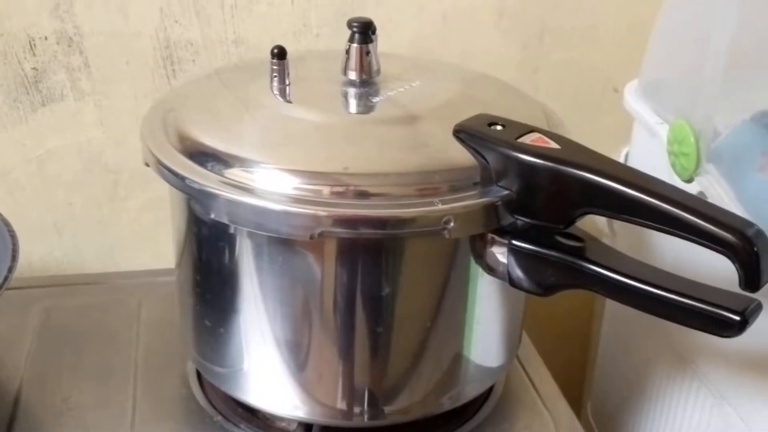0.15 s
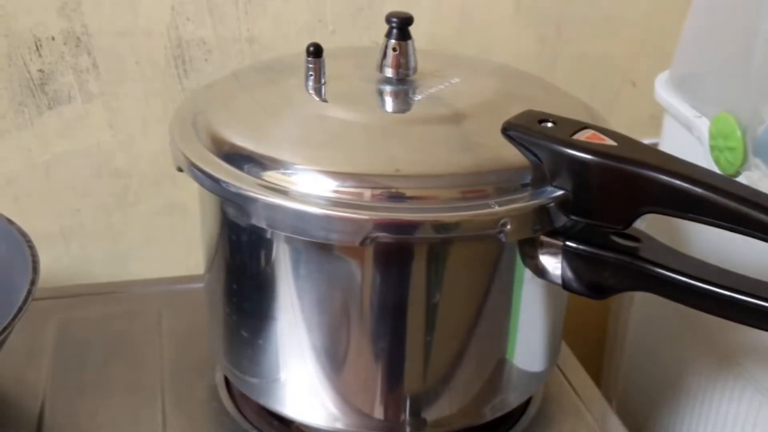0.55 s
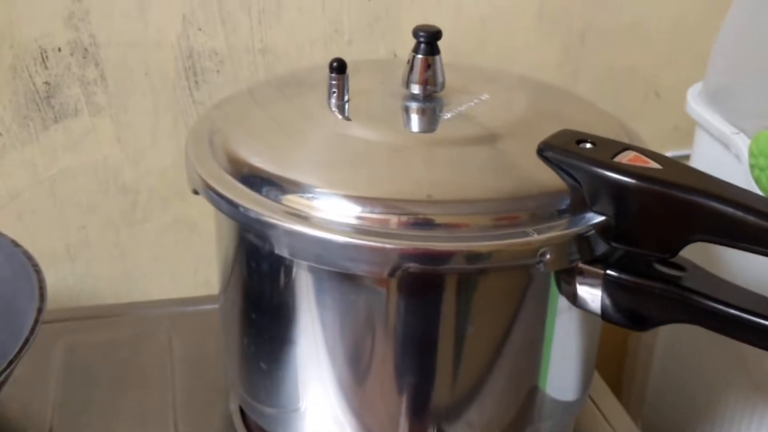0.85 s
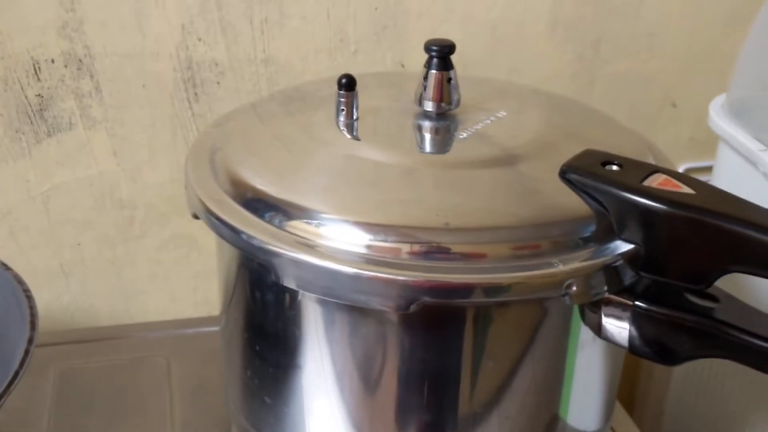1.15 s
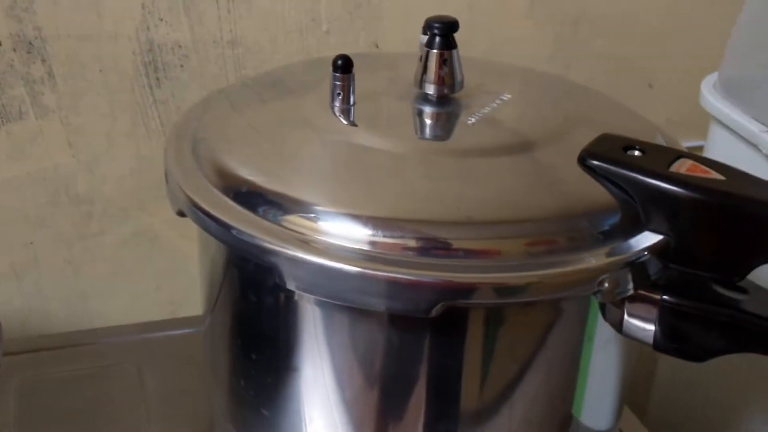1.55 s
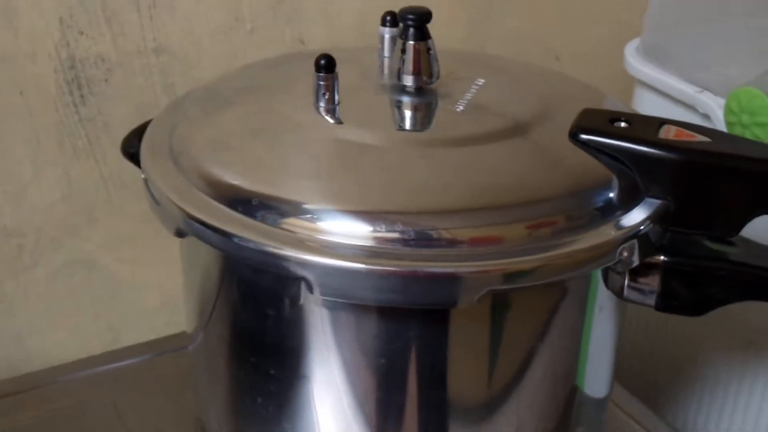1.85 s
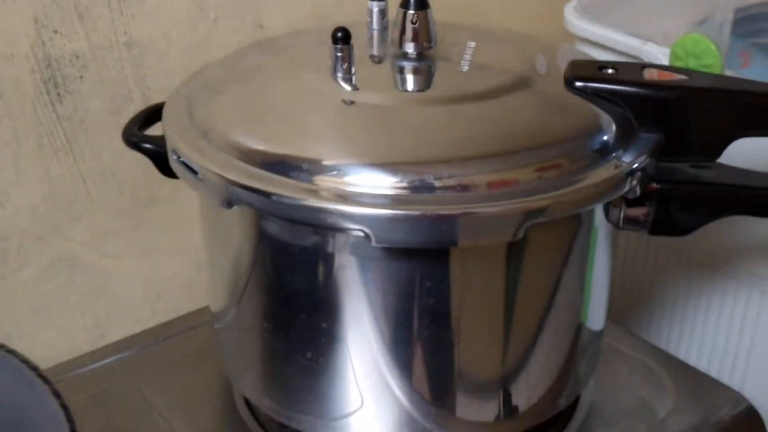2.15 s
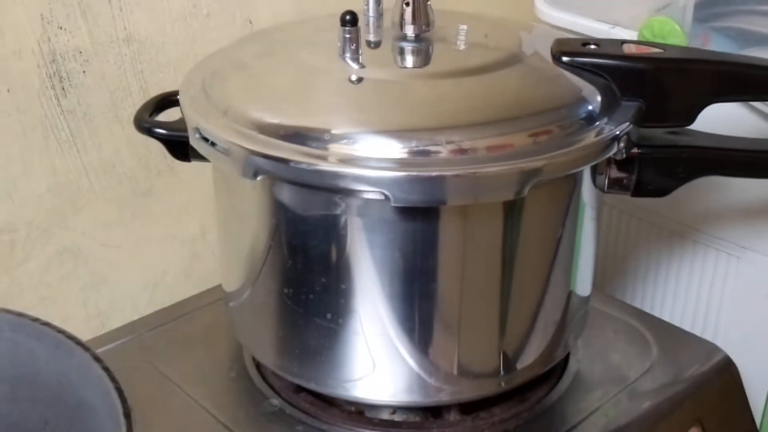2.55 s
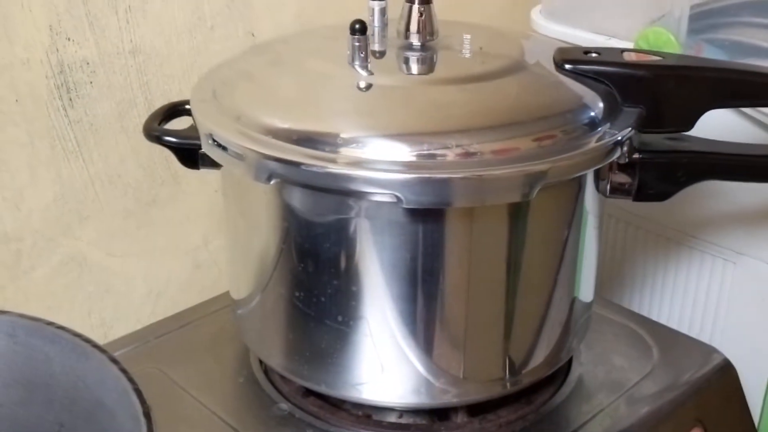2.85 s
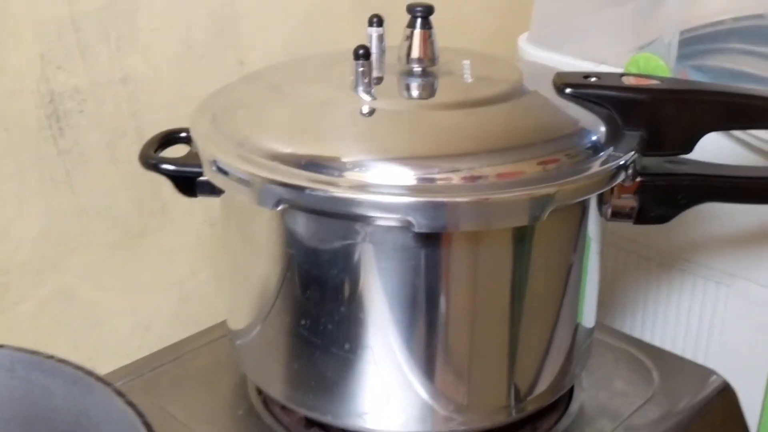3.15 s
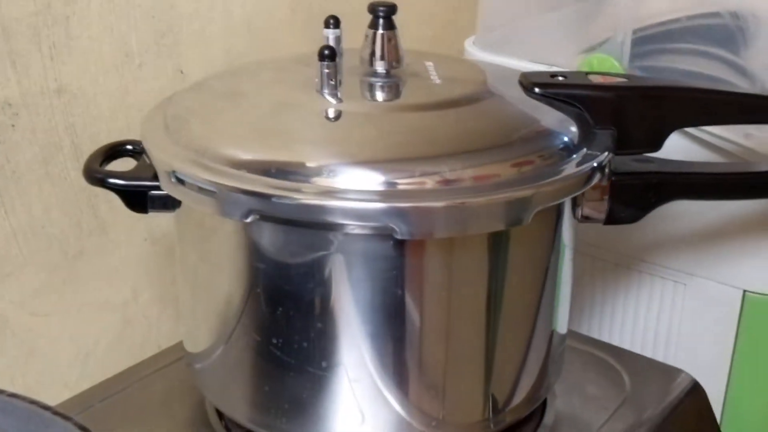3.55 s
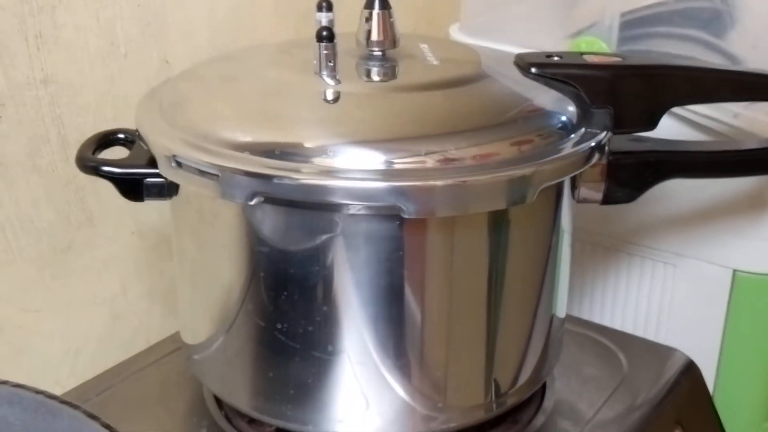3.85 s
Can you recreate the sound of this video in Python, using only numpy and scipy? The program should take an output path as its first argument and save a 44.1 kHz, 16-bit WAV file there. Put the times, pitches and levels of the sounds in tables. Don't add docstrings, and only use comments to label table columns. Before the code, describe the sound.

A loud bright steam hiss rushes from a pressure cooker's rocking weight, with faint bubbling pops and handling bumps.

```python
import sys
import numpy as np
from scipy import signal
from scipy.fft import rfft, irfft, next_fast_len
from scipy.io import wavfile
from scipy.ndimage import uniform_filter1d, map_coordinates

SR = 44100
rng = np.random.default_rng(int(sys.argv[2]) if len(sys.argv) > 2 else 0)


def gain_from_decibels(decibels):
    exponent = np.asarray(decibels, float) / 20
    return 10 ** exponent


def inscribe(sig):
    pcm = np.round(np.clip(np.atleast_2d(sig).T, -1, 1) * 32767)
    wavfile.write(sys.argv[1], SR, pcm.astype(np.int16))


N = 176400
T = np.arange(N) / SR


def unit(x):
    return x / np.sqrt(np.mean(x ** 2) + 1e-20)


def curves(rows):
    s, *columns = np.transpose(rows)
    return [np.interp(T, s, column) for column in columns]


def wobble(rate):
    return map_coordinates(rng.standard_normal(4000), [T * rate])


def filtered(x, response):
    m = next_fast_len(N + SR // 4)
    return irfft(rfft(x, m) * response(np.fft.rfftfreq(m, 1 / SR)), m)[:N]


def coloured(x, points):
    f, db = np.transpose(points)
    return filtered(x, lambda hz: gain_from_decibels(np.interp(np.log(hz + 1), np.log(f + 1), db, -120, -120)))


def blurred_field(shape, bins, frames):
    field = uniform_filter1d(rng.standard_normal(shape), size=bins, axis=0)
    return unit(uniform_filter1d(field, size=frames, axis=1))


def patchy(patchy_db):
    z = signal.stft(rng.standard_normal(N), nperseg=1024)[2]
    narrow = blurred_field(z.shape, bins=3, frames=5)
    wide = blurred_field(z.shape, bins=14, frames=8)
    gain = gain_from_decibels(patchy_db * (0.95 * narrow + 0.51 * wide))
    return unit(signal.istft(z * gain, nperseg=1024)[1][:N])


def blips(rows, cycles, rise, lag_s):
    out = np.zeros(N)
    for s, db, hz in rows:
        u = (T - s - lag_s) * hz
        swell = np.exp(-2 * (u / cycles) ** 2)
        out += gain_from_decibels(db) * swell * np.cos(2 * np.pi * u * (1 + rise * np.tanh(u / cycles)))
    return out


# (time [s], open jet level [dB], microphone turned to the lid [dB])
STEAM_FLOW = [(0.0, -35.4, 1.5), (0.25, -33, 0.5), (0.6, -37.5, -0.5), (1.0, -32, 2.5), (1.3, -32, 0),
              (1.55, -36.5, 2), (1.8, -37.5, 3), (2.05, -32.9, 1.5), (2.4, -34, 0.5), (2.65, -33.5, 0.5),
              (3.15, -33, 2), (3.35, -32.5, 2), (3.55, -33, 2.5), (3.72, -34.5, 2.5), (3.83, -31.5, 1),
              (4.0, -34.3, 4.5)]
# (time [s], depth [dB], half length [s])
WEIGHT_CHOKES = [(0.072, 6.5, 0.014), (0.163, 5, 0.017), (0.302, 4.7, 0.033), (0.429, 3, 0.023),
                 (0.502, 3.5, 0.016), (0.584, 2, 0.012), (0.775, 4.5, 0.015), (0.873, 4, 0.011),
                 (0.948, 5, 0.021), (1.027, 3.5, 0.02), (1.134, 4.5, 0.042), (1.277, 5, 0.013),
                 (1.384, 5.5, 0.016), (1.527, 6, 0.043), (1.669, 4, 0.016), (1.737, 3.5, 0.017),
                 (1.882, 6, 0.015), (1.973, 5, 0.0073), (2.208, 4.5, 0.044), (2.377, 1.6, 0.013),
                 (2.467, 5.2, 0.018), (2.608, 6, 0.052), (2.774, 5.5, 0.017), (2.875, 7, 0.025),
                 (2.991, 7, 0.035), (3.111, 7.5, 0.021), (3.302, 7, 0.047), (3.44, 5.5, 0.027),
                 (3.597, 2.4, 0.044), (3.903, 3.9, 0.018)]
# (frequency [Hz], level [dB per Hz])
LID_SIDE = [(500, -33), (1000, -19), (1600, -15), (2150, -5), (2600, -4), (3050, -6.5), (3600, -14)]
# (frequency [Hz], level [dB per Hz])
JET_CORE = [(600, -20.5), (1500, -15), (3000, -8.5), (4000, -2.5), (5100, -1), (6000, -4), (6800, -7.5),
            (8500, -22)]
# (frequency [Hz], level [dB per Hz])
JET_FIZZ = [(5500, -23), (7000, -9.5), (8100, -5), (10900, -10), (11700, -19), (13000, -21.5),
            (14200, -28.5), (15700, -27.5)]
# (frequency [Hz], level [dB per Hz])
MID_PEAK = [(1090, -32), (1200, -1.5), (1380, 0), (1520, -13), (1700, -14)]


def steam():
    open_db, lid_db = curves(STEAM_FLOW)
    s, depth, half = np.transpose(WEIGHT_CHOKES)[:, :, None]
    choke_db = (depth * np.exp(-.5 * ((T - s) / half) ** 2)).sum(0)
    flow_db = open_db - choke_db + 0.6 * wobble(30.18)
    swing = flow_db - flow_db.mean()

    spits_per_s, spit_db = 1500, -20
    droplets = (rng.random(N) < spits_per_s / SR) * rng.standard_normal(N)
    spit = gain_from_decibels(spit_db) * unit(droplets)

    peak_db, peak_fade_db_per_s = -9.5, 4.5
    parts = [(LID_SIDE, 0.89 * swing + lid_db),
             (JET_CORE, 1.0 * swing),
             (JET_FIZZ, 1.21 * swing),
             (MID_PEAK, peak_db + .5 * swing - peak_fade_db_per_s * T)]
    jet = np.zeros(N)
    for shape, db in parts:
        drift_db = .5 * wobble(13)
        jet += gain_from_decibels(db + drift_db) * coloured(patchy(patchy_db=2.0) + spit, shape)

    notch_hz, notch_wide_hz, notch_db = 3044, 220, -3.5
    jet = filtered(jet, lambda hz: gain_from_decibels(notch_db * np.exp(-((hz - notch_hz) / notch_wide_hz) ** 2)))
    return gain_from_decibels(flow_db.mean() + 1.18 + 6.5) * jet


# (time [s], peak level [dB], pitch [Hz])
BUBBLE_POPS = [
    (.245, -48, 830),
    (.725, -43, 800),
    (.782, -41.5, 830),
    (.822, -40, 1220),
    (.873, -43.5, 780),
    (.957, -43, 860),
    (1.118, -46, 790),
    (1.2, -44, 845),
    (1.435, -46, 834),
    (2.632, -39, 1260),
]


def bubbles():
    return gain_from_decibels(-2.5) * blips(BUBBLE_POPS, cycles=5.0, rise=.04, lag_s=0)


def kitchen(x):
    level_db, t60_s, gap_s = -11, .3, .006
    t = T[:SR // 2]
    tail = rng.standard_normal(len(t)) * gain_from_decibels(-60 * t / t60_s) * (t > gap_s)
    return gain_from_decibels(level_db) * signal.fftconvolve(x, tail / np.linalg.norm(tail))[:N]


# (time [s], peak level [dB], pitch [Hz])
HAND_BUMPS = [(0.18, -46, 59.7), (0.378, -43, 59.2), (0.557, -35.5, 64.4), (0.65, -41, 59.2),
              (1.826, -37, 64.6), (2.187, -45, 65.5), (2.788, -49, 59.2), (3.094, -39.5, 68),
              (3.15, -38, 76), (3.62, -45, 91.5), (3.87, -39, 113)]
# (time [s], peak level [dB], pitch [Hz])
FINGER_TICKS = [(.176, -40.5, 277), (.315, -50, 480), (.331, -44, 374), (1.87, -43, 296), (2.055, -42, 700),
                (2.192, -46, 600), (2.62, -48, 240), (2.635, -41, 800), (2.65, -48, 450), (2.265, -52, 300),
                (2.845, -36.5, 1030), (2.86, -40.5, 484), (3.64, -49, 500), (3.88, -41, 650)]


def handling():
    bumps = gain_from_decibels(-1.5) * blips(HAND_BUMPS, cycles=1.76, rise=.03, lag_s=0.0178)
    return bumps + blips(FINGER_TICKS, cycles=0.87, rise=.03, lag_s=0)


# (time [s], drone level [dB], octave level [dB])
MOTOR_LEVELS = [(0, -49, -59), (.5, -51.5, -62), (.7, -44, -66), (1.2, -51.5, -77), (1.75, -51.5, -68),
                (1.95, -48, -59), (2.3, -53.5, -66), (2.55, -53.5, -54), (2.95, -65, -68.5),
                (3.5, -57.5, -55.5), (3.75, -57, -60), (4, -55, -58)]


def motor():
    motor_hz, waver_hz, fifth_db = 55.7, 0.53, -19
    drone_db, octave_db = curves(MOTOR_LEVELS)
    turn = 2 * np.pi * np.cumsum(motor_hz + waver_hz * wobble(3.03)) / SR
    drone = gain_from_decibels(drone_db + 2.5 + 0.9 * wobble(9.9)) * np.sin(turn)
    octave = gain_from_decibels(octave_db + 1.7 * wobble(8.56)) * np.sin(2 * turn)
    fifth = gain_from_decibels(drone_db + fifth_db + 2.6 * wobble(14)) * np.sin(5 * turn + 0.49 * wobble(25))
    return drone + octave + fifth


def whine():
    whine_hz, level_db, from_s, to_s, fade_s = 525, -72, .6, 3.7, 0.41
    on = np.clip(np.minimum(T - from_s, to_s - T) / fade_s, 0, 1)
    return on * gain_from_decibels(level_db + 2.3 * wobble(3.2)) * np.sin(2 * np.pi * whine_hz * T)


# (frequency [Hz], level [dB per Hz])
ROOM_TONE = [(30, -33), (45, -10), (62, -2.5), (110, -5), (160, -13), (280, -16.5), (450, -20),
             (1200, -23.5)]


def room():
    return gain_from_decibels(-55.5 + 1.2 * wobble(7)) * unit(coloured(patchy(patchy_db=1.5), ROOM_TONE))


def scene():
    cooker = steam() + bubbles()
    mono = cooker + kitchen(cooker) + handling() + motor() + whine() + room()
    return np.tile(mono, (2, 1))


TOP_HZ = 15750


def microphone(x):
    low_cut_hz = 27
    return filtered(x, lambda hz: (hz < TOP_HZ) / np.sqrt(1 + (low_cut_hz / (hz + 1)) ** 8))


def thin_treble(x):
    holes_over_hz, holes_percent, follow = 12900, 17, .75
    hz, _, z = signal.stft(x, SR, nperseg=1024, noverlap=768)
    power = uniform_filter1d(uniform_filter1d(abs(z) ** 2, size=3, axis=0), size=7, axis=1)
    top = (hz > holes_over_hz) & (hz < TOP_HZ)
    power = power / (np.median(power[top], axis=0) + 1e-20) ** follow
    keep = ~top[:, None] | (power > np.percentile(power[top], holes_percent))
    return signal.istft(z * keep, nperseg=1024, noverlap=768)[1][:N]


# (time [s], low edge [Hz], high edge [Hz], level [dB])
SIDE_BURSTS = [
    (.589, 8200, 9700, -58),
    (1.819, 11000, 12500, -64),
    (2.097, 4200, 5200, -46),
    (2.097, 6300, 7560, -50),
    (2.401, 7500, 9700, -47),
    (3.981, 4700, 6400, -45),
    (3.981, 7500, 9000, -52),
    (3.981, 11000, 12500, -59),
]


def side_noise():
    burst_s = 2048 / 44100
    side = np.zeros(N)
    for s, lo_hz, hi_hz, db in SIDE_BURSTS:
        band = unit(filtered(rng.standard_normal(N), lambda hz: (hz > lo_hz) & (hz < hi_hz)))
        window = np.cos(np.pi * np.clip((T - s) / burst_s, -.5, .5)) ** 2
        side += gain_from_decibels(db + 4.0) * band * window
    return side


def roll_off(x):
    return signal.sosfilt(signal.butter(12, 15920, fs=SR, output="sos"), x)


def record(dry):
    mono = thin_treble(microphone(dry[0]))
    side = side_noise()
    return roll_off(np.array([mono + side, mono - side]))


dry = scene()
out = record(dry)
inscribe(out)
```